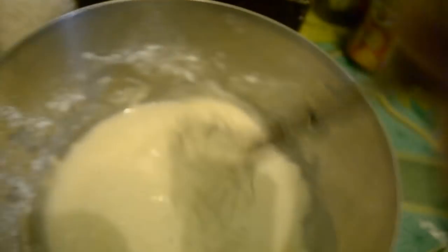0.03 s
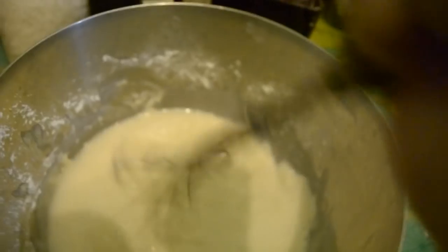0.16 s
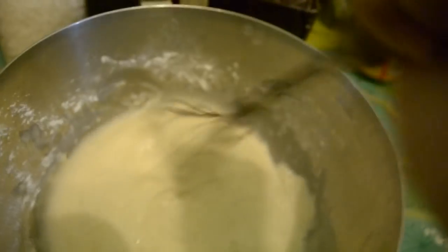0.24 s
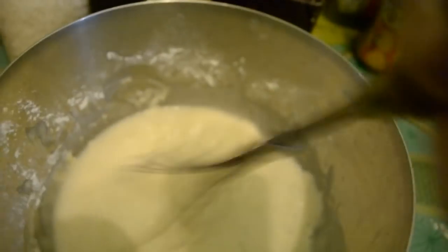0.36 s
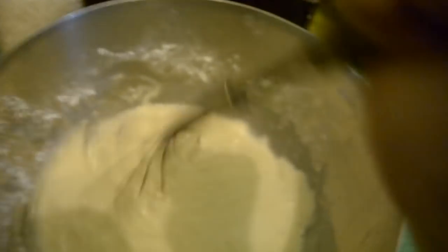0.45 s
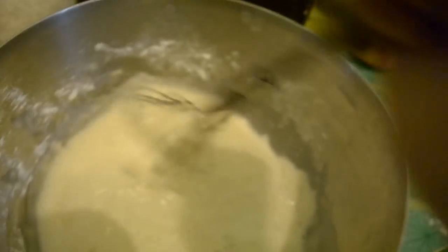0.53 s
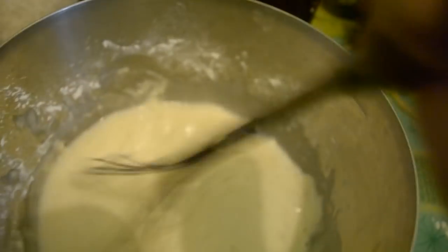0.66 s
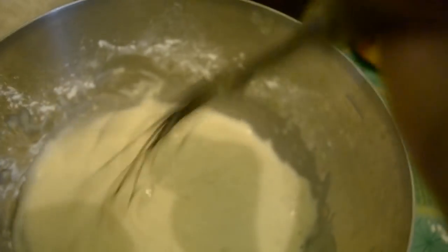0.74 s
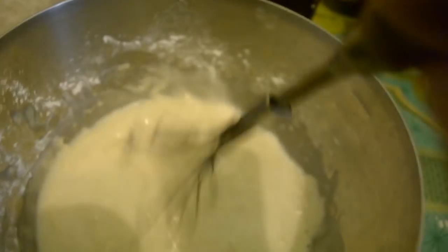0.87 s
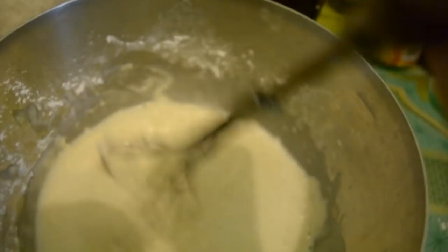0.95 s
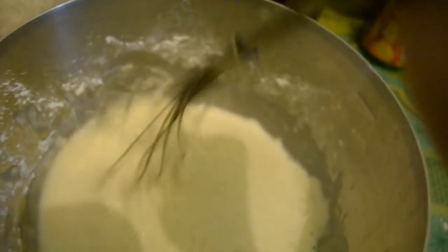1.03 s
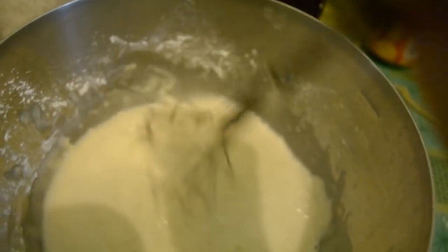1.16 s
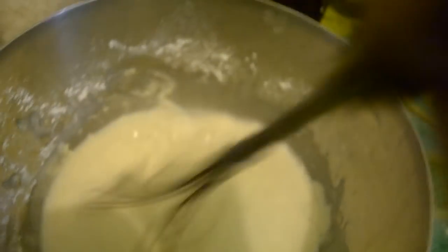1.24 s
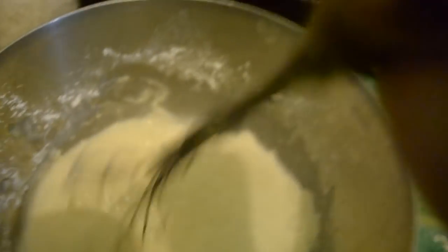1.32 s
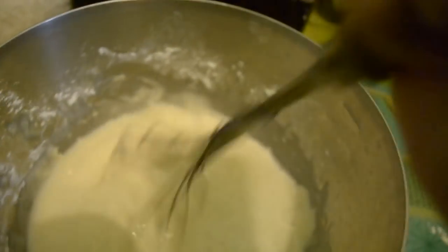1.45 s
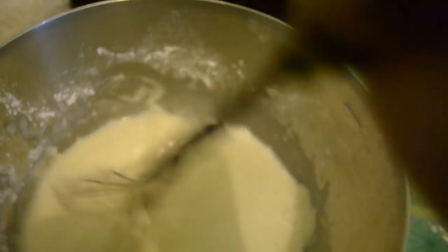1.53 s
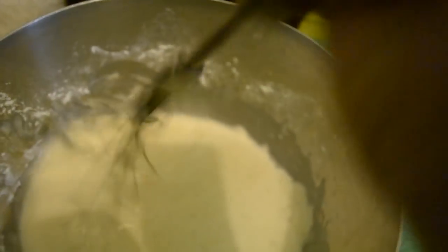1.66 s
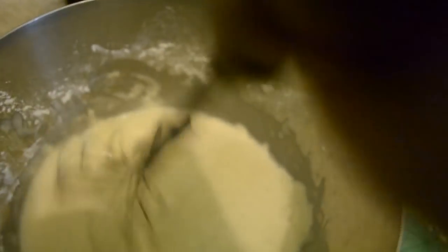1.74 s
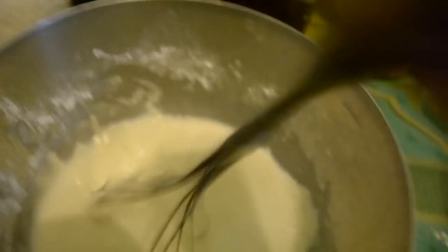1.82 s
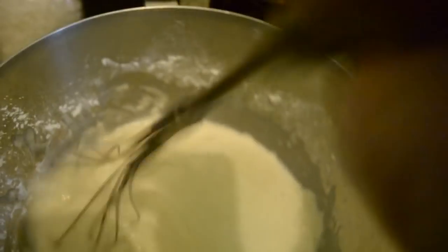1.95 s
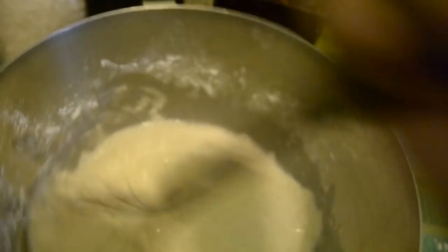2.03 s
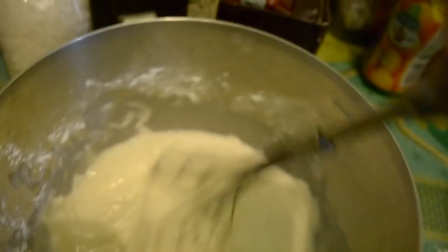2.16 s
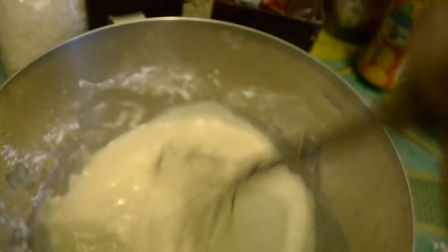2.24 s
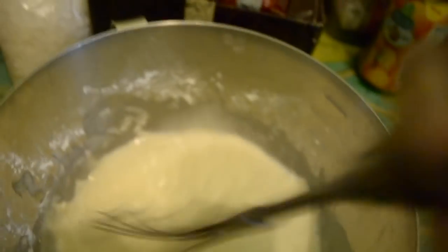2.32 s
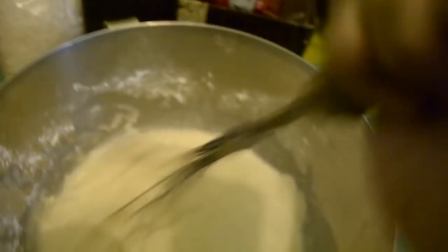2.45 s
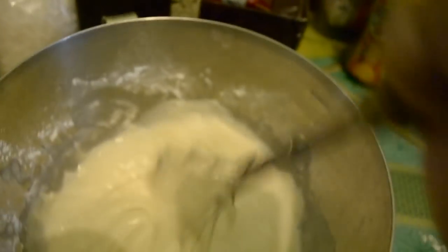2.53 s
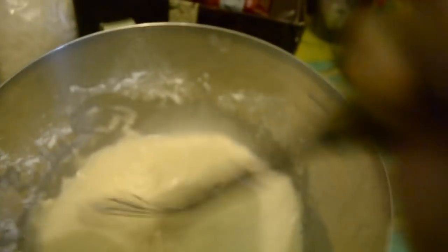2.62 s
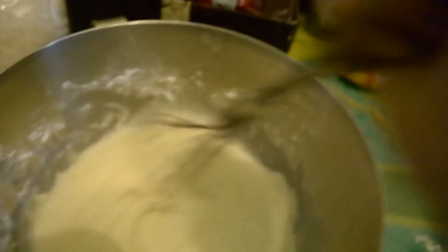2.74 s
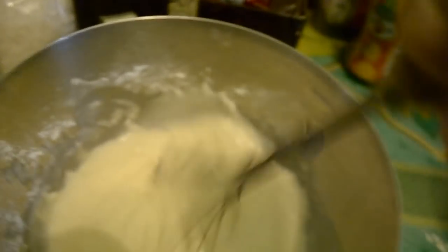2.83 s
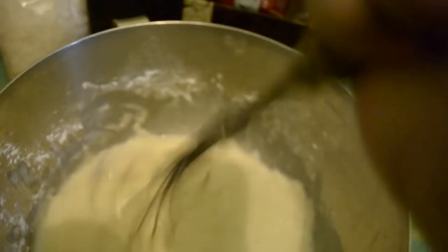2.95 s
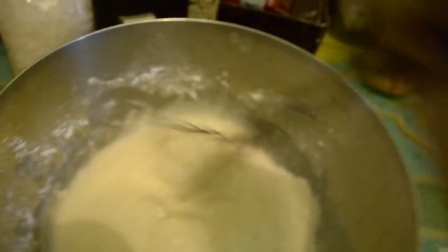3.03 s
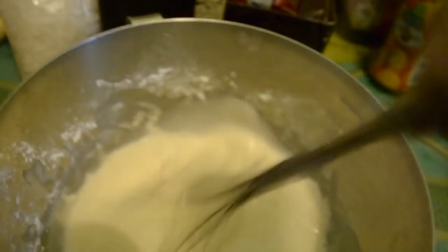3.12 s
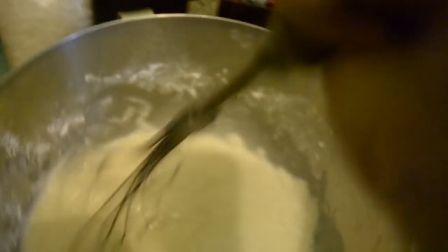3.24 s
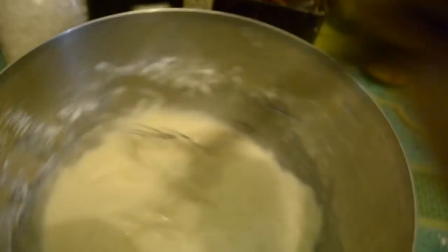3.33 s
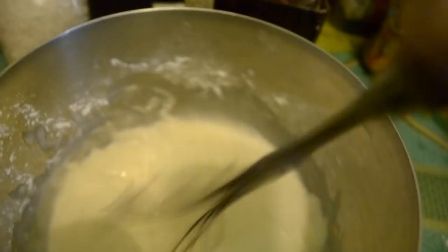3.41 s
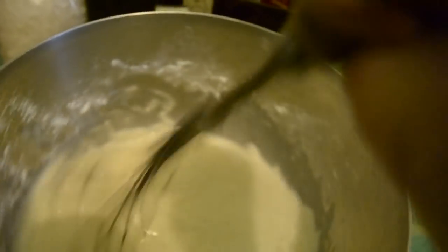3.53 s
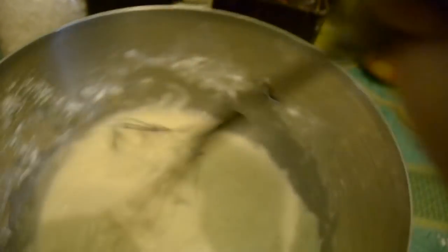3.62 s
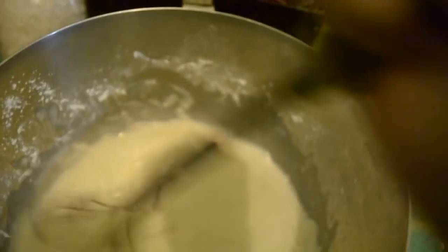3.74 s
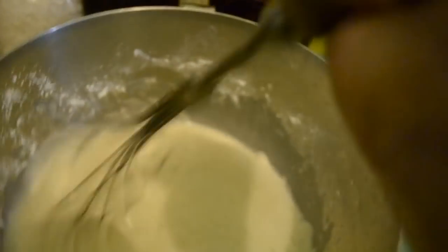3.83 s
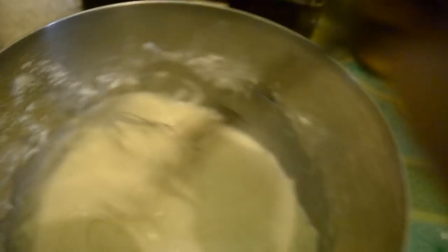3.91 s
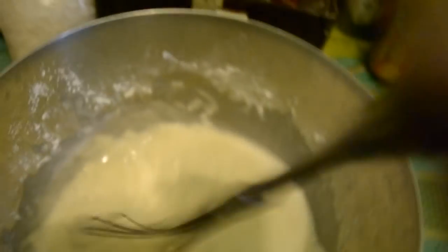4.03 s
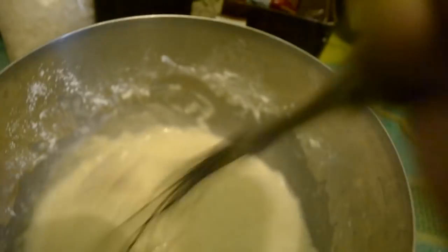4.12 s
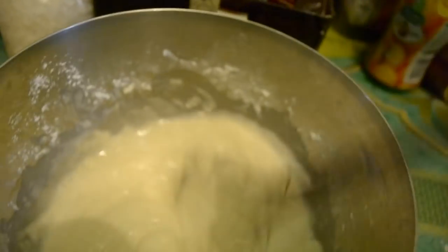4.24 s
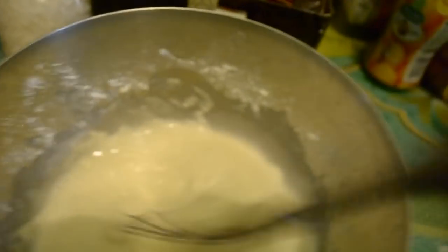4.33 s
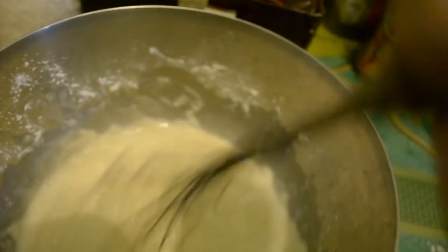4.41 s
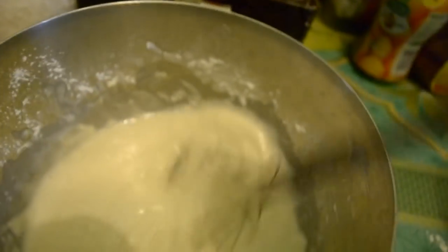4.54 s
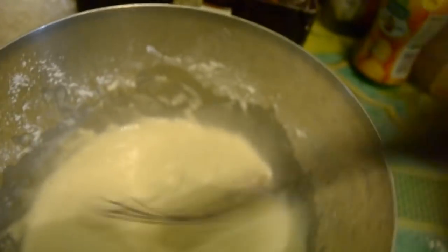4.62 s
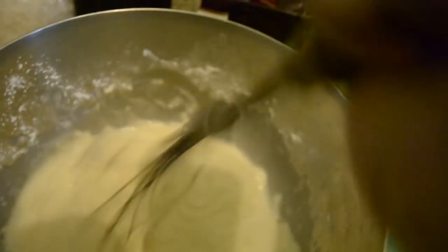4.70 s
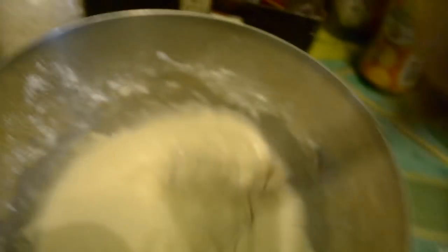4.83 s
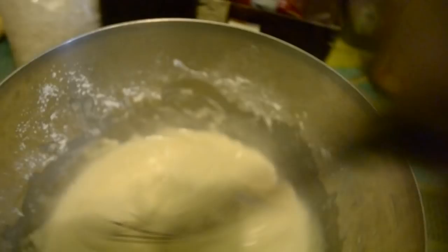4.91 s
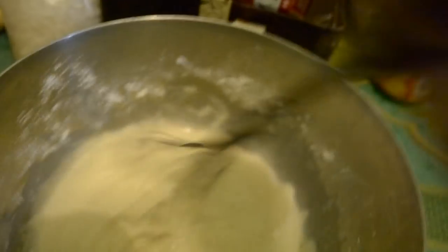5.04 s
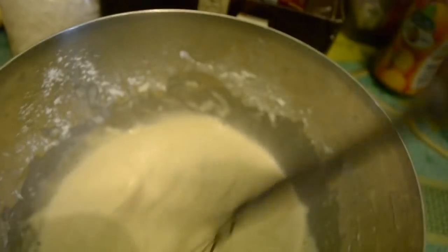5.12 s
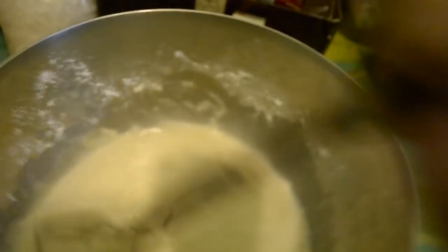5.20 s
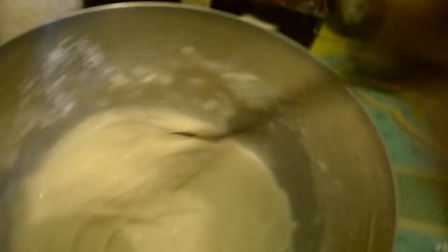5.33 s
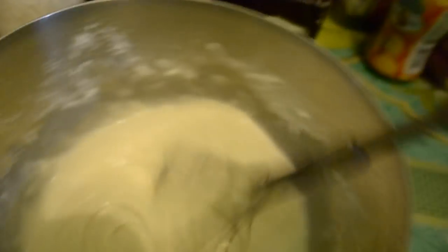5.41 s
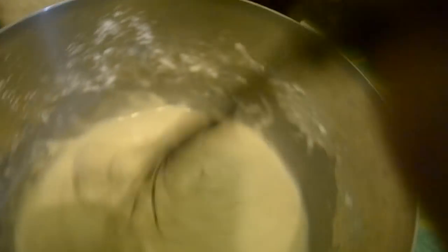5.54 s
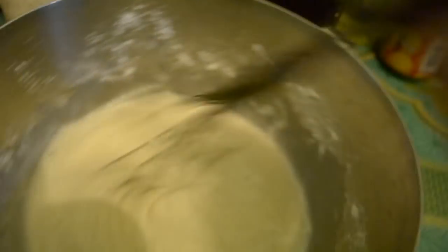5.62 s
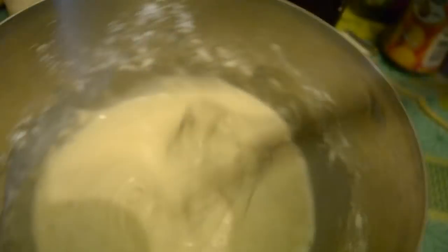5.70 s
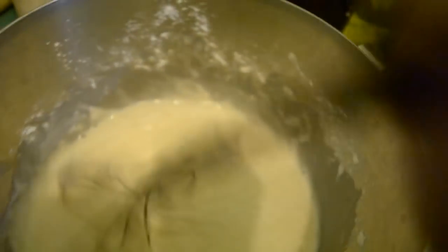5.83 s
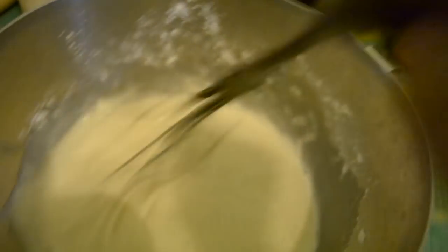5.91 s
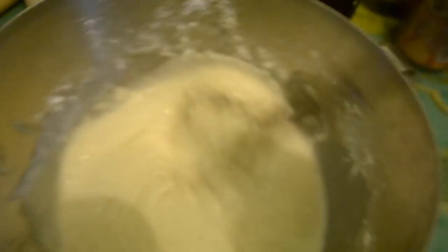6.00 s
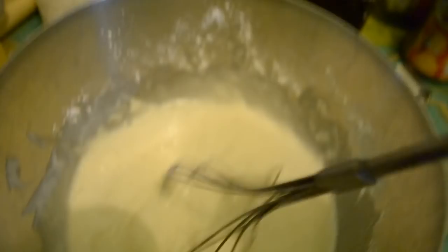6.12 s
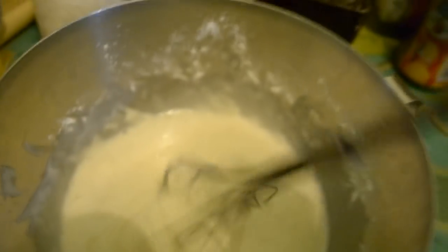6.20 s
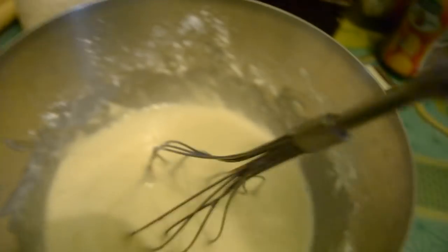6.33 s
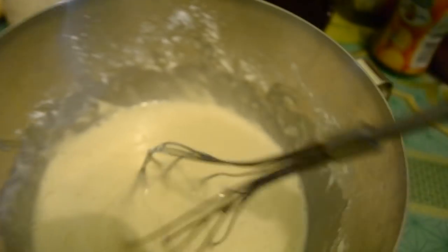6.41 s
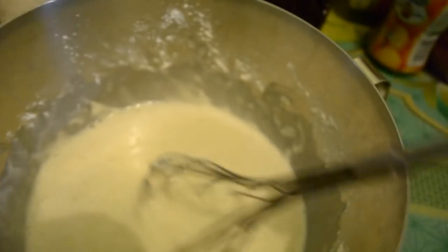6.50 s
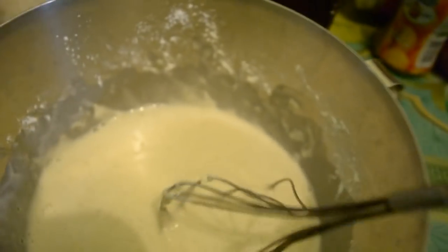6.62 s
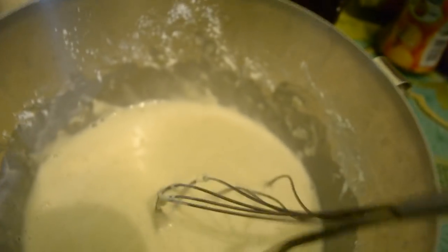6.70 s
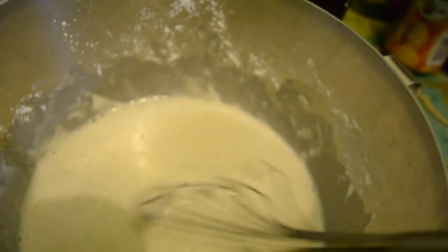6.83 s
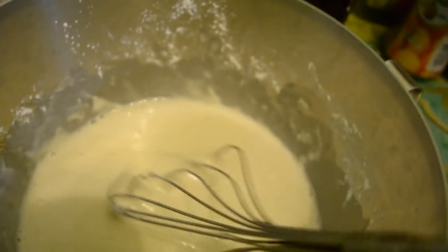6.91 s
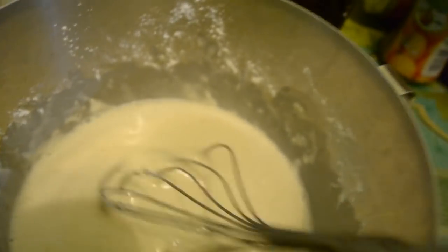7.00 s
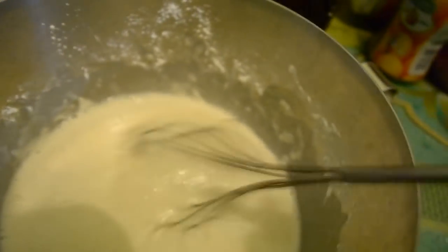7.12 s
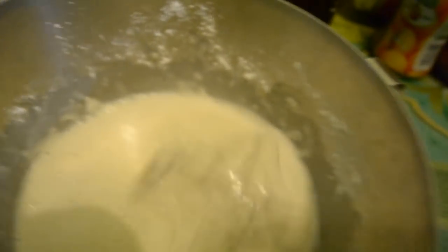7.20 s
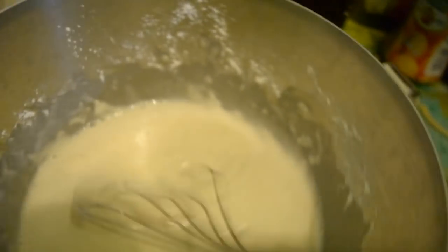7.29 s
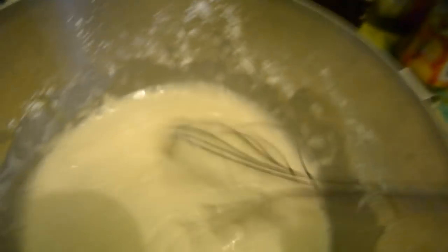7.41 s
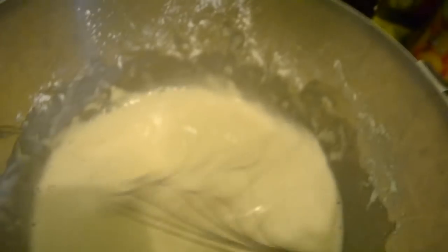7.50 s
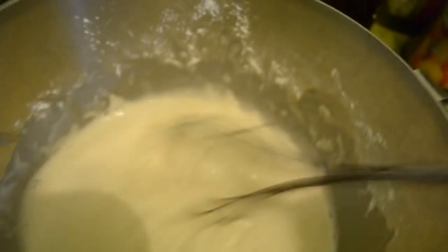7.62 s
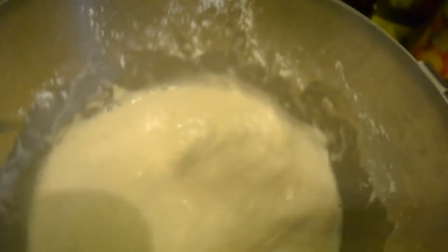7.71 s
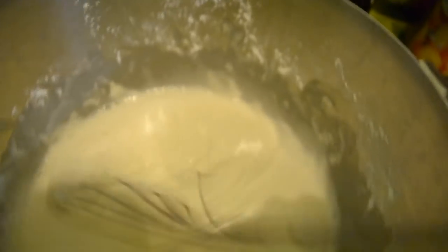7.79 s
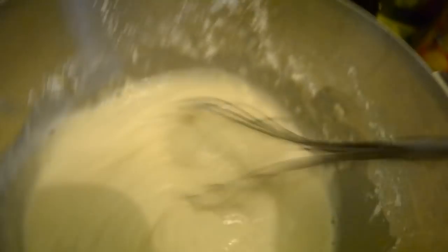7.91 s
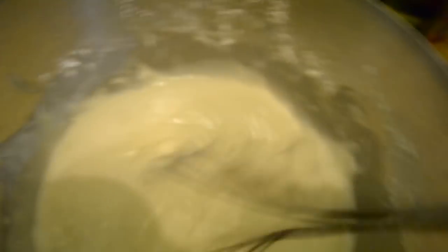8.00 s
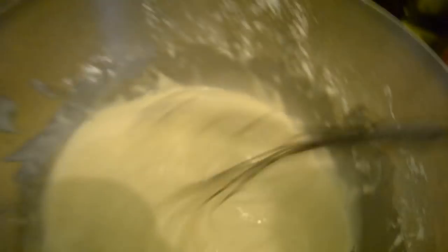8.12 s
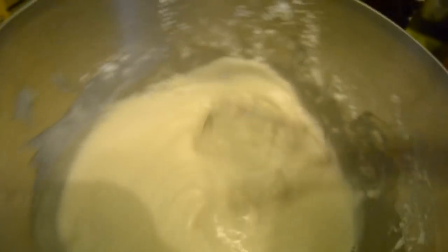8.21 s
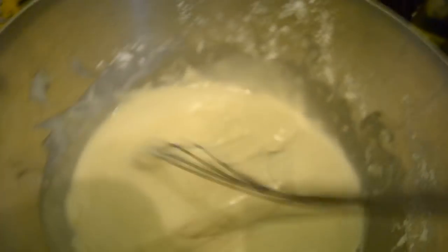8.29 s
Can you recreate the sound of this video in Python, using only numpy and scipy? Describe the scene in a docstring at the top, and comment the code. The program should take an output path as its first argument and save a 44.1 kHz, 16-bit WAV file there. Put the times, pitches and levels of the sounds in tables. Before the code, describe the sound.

In a small kitchen, close to a thin-sounding microphone with little bass, a wire whisk beats runny batter in a steel bowl. From 0 s, short gritty scrapes come roughly six a second, uneven in force, each mixing midrange grating on damped steel, rattling wires and a bright wet swish. Small knocks and dull bowl thuds punctuate them; a soft batter slap falls near 1.8 s. From 2.3 s strokes become steadier, with tiny squeaks around 3 kHz. The hardest, busiest scraping runs about 3.9-5.3 s, with squeaks clustered at 4.7-5.1 s. It softens until 6.3 s, then nearly rests. Light touches return at 6.9 s, and firm ringing strokes from 7.25 s continue to the end at about 8.3 s, with a strong knock at 7.8 s. Behind lie soft room noise, faint steady tones, a low hum fading by 2.3 s and very faint, high, cricket-like chirping.

```python
"""Whisking batter in a steel bowl

A wire whisk beats thin batter, about six strokes a second, with a short rest.
Filtered grit makes the wires grate over batter-damped steel and swish through the liquid.
Noise bursts through the same resonances knock on the bowl; unsteady tones squeak.
Behind: kitchen noise, steady tones, a fading low hum and faint, high, cricket-like chirping."""
import sys
import numpy as np
from scipy import signal
from scipy.io import wavfile
from scipy.ndimage import uniform_filter1d

SR = 44100
rng = np.random.default_rng(int(sys.argv[2]) if len(sys.argv) > 2 else 0)


def file_out(sig):
    """Save sig as 16-bit WAV at sys.argv[1]."""
    # one column per channel
    cols = np.atleast_2d(sig).T
    # limit, then scale
    lim = np.clip(cols, -1, 1)
    pcm = np.round(lim * 32767).astype(np.int16)
    wavfile.write(sys.argv[1], SR, pcm)


N = 368235
TIME_S = np.arange(N) / SR


def amp(db):
    """Decibels to gain."""
    return 10 ** (np.asarray(db) / 20)


def evened(x):
    """Scales to an rms of one."""
    return x / np.sqrt(np.mean(x ** 2) + 1e-20)


def steadied(x, size=900):
    """Keeps the fine grain of a force while its short-term rms (size samples) is held at one."""
    return x / np.sqrt(abs(uniform_filter1d(x ** 2, size=size)) + 1e-6)


def add(mix, start_s, sound):
    """Mixes a sound in at start_s."""
    part = mix[max(round(start_s * SR), 0):][:len(sound)]
    part += sound[:len(part)]


def wander(rate_hz, size=N):
    """Slow chance, rms one: random values, two per cycle of rate_hz, joined by straight lines."""
    place = np.arange(size) * 2 * rate_hz / SR
    knots = rng.standard_normal(size // 10)
    return evened(np.interp(place, np.arange(len(knots)), knots))


def fuzzy(pitch_hz, width_hz, size=N):
    """A tone whose level and phase wander: two randomly weighted quadratures, rms about one."""
    angle = 2 * np.pi * pitch_hz * np.arange(size) / SR
    in_phase = wander(width_hz, size=size) * np.cos(angle)
    quadrature = wander(width_hz, size=size) * np.sin(angle)
    return in_phase + quadrature


def response(body, modes=(), size=4096):
    """Causal impulse response of unit energy: a broad colour with resonances standing on it."""
    hz = np.fft.rfftfreq(size, 1 / SR)
    knots_hz, knots_db = np.transpose(body)
    power = amp(np.interp(np.log(hz + 1), np.log(knots_hz), knots_db)) ** 2
    for centre_hz, width_hz, mode_db in modes:
        power = power + (amp(mode_db) / (1 + ((hz - centre_hz) / width_hz) ** 2 * 2)) ** 2
    # minimum phase: the Hilbert transform of the log gain gives the phase
    log_gain = np.log(np.r_[power, power[-2:0:-1]]) / 2
    spectrum = np.exp(np.conj(signal.hilbert(log_gain)))
    ring = np.fft.ifft(spectrum).real[:size // 2]
    ring = ring * signal.windows.hann(size)[size // 2:]
    return ring / np.linalg.norm(ring)


def through(x, ring):
    """Sends a force through a response."""
    return signal.oaconvolve(x, ring)[:len(x)]


def grit(rate_hz, spread_db, smooth):
    """Tiny slips or bursting bubbles of unequal size over a smooth rub."""
    sizes = amp(spread_db * np.minimum(rng.exponential(1, N), 4))
    slips = sizes * rng.choice([-1, 1], N) * (rng.random(N) < rate_hz / SR)
    return evened(evened(slips) + smooth * rng.standard_normal(N))


# kitchen noise colour: hz [Hz], density_db [dB per Hz, relative]
KITCHEN_COLOUR = [(25, -22), (70, -38), (90, -23), (130, -13), (170, -3.5), (280, 2.5), (450, -3.5),
                  (900, -4), (1500, -7), (2400, -11), (3500, -20), (6000, -26), (8200, -31), (10300, -33),
                  (11200, -54)]
# faint steady tones: pitch_hz [Hz], level_db [dB]
KITCHEN_TONES = [(160, -78), (488, -73.5), (775, -71.5), (920, -71.5)]
# drone gain over time: time_s [s], gain_db [dB]
DRONE_GAIN = [(0, -71), (1.5, -73.5), (2.3, -83.5), (8.3, -89.5)]
KITCHEN_DB, DRONE_HZ = -58.5, 104.8
CHIRP_HZ, CHIRP_RATE_HZ, CHIRP_DB = 6790, 8.2, -75


def background():
    """Room noise, faint tones, a distant drone that fades away and an even train of high chirps."""
    air = amp(KITCHEN_DB) * through(rng.standard_normal(N), response(KITCHEN_COLOUR))
    tones = sum(amp(level_db) * fuzzy(pitch_hz, 5) for pitch_hz, level_db in KITCHEN_TONES)
    drone = amp(1) * fuzzy(DRONE_HZ, 11) + amp(4) * fuzzy(3 * DRONE_HZ, 10) + amp(10) * fuzzy(370, 140)
    drone = amp(np.interp(TIME_S, *np.transpose(DRONE_GAIN))) * drone
    gate = np.maximum(np.cos(2 * np.pi * CHIRP_RATE_HZ * (TIME_S - 6.68)), 0)
    chirps = amp(CHIRP_DB) * evened(gate * fuzzy(CHIRP_HZ, 230))
    return air + tones + drone + chirps


def room(x, t60_s=0.097, wet_db=-12, late_t60_s=0.26, late_db=-16, dull_hz=7000, drift_hz=1.697,
         size=22000, count=3):
    """Near reflections and a fainter, longer wash; they change as the arm and bowl move."""
    t, wet = np.arange(size) / SR, np.zeros(N)
    fade = (t > .005) * (amp(-60 * t / t60_s) + amp(late_db - 60 * t / late_t60_s))
    for k in range(count):
        taps = rng.standard_normal(size) * (rng.random(size) < 4000 / SR) * fade
        tail = signal.lfilter(*signal.butter(1, min(dull_hz, SR / 3), fs=SR), taps)
        # drift_hz counts half turns of the crossfade per second
        share = np.sqrt(2 / count) * np.cos(np.pi * (drift_hz * TIME_S + k / count))
        wet += through(share * x, tail / np.linalg.norm(tail))
    return x + amp(wet_db) * wet


# batter slapping down: start_s [s], level_db [dB], fade_s [s, Gaussian sigma]
SLOP_EVENTS = [(.312, -53.5, 0.032), (1.828, -44.5, 0.037), (6.459, -61.5, 0.045)]
# slap colour: hz [Hz], level_db [dB, relative]
SLOP_COLOUR = [(30, -29), (100, -24), (220, 9.5), (450, 10), (900, -2), (2000, -1.5), (5000, -2),
               (11000, -11.5)]


def slops(size=10000):
    """Batter falls back with a dull, crackling slap: fading grit through a broad colour."""
    swell, t = np.zeros(N), np.arange(size) / SR
    for start_s, level_db, fade_s in SLOP_EVENTS:
        add(swell, start_s, amp(level_db) * np.exp(-(t / fade_s) ** 2 / 2))
    crackle = steadied(grit(rate_hz=1200, spread_db=4, smooth=.5))
    return through(swell * crackle, response(SLOP_COLOUR))


def bowed(x, start_s, length_s, level_db):
    """Cuts a short swell out of a sustained sound."""
    part = evened(x)[:round(length_s * SR)]
    return start_s, amp(level_db) * part * signal.windows.tukey(len(part), .5)


# wire sticking and slipping on steel: start_s [s], length_s [s], pitch_hz [Hz], level_db [dB]
SQUEAK_EVENTS = [(0.24, 0.025, 3150, -42.5), (0.478, 0.04, 3075, -46), (1.375, 0.014, 2970, -40.5),
                 (2.417, 0.077, 2930, -44.5), (3.018, 0.032, 3047, -37.5), (3.42, 0.032, 4020, -41.5),
                 (3.556, 0.032, 3020, -41), (4.452, 0.049, 3010, -37), (4.729, 0.031, 3015, -35.5),
                 (4.761, 0.024, 2315, -42), (4.778, 0.043, 3180, -45), (5.028, 0.01, 3040, -32),
                 (5.042, 0.019, 3110, -32), (5.071, 0.013, 3040, -32), (5.588, 0.061, 3010, -37),
                 (5.606, 0.015, 5620, -43), (5.896, 0.03, 2940, -41), (7.87, 0.044, 3084, -43.5)]
# wet film squeezed under a wire: start_s [s], length_s [s], pitch_hz [Hz], level_db [dB]
SIZZLE_EVENTS = [(1.315, 0.048, 8800, -52), (2.116, 0.027, 8500, -45), (3.239, 0.037, 9200, -46.5),
                 (4.571, 0.047, 10000, -55), (4.949, 0.074, 9270, -45.5), (5.381, 0.021, 9100, -44.5),
                 (5.992, 0.08, 9800, -48.5), (6.284, 0.051, 9740, -55)]


def squeaks(jitter=0.021, flutter_db=3, sizzle_width_hz=700, size=6000):
    """Stick-slip locks on to a wire resonance as an unsteady tone; the wet film sizzles far above."""
    out = np.zeros(N)
    for start_s, length_s, pitch_hz, level_db in SQUEAK_EVENTS:
        turns = np.cumsum(pitch_hz * (1 + jitter * wander(126, size=size))) / SR
        tone = np.sin(2 * np.pi * turns) * amp(flutter_db * wander(187, size=size))
        add(out, *bowed(tone, start_s, length_s, level_db))
    for start_s, length_s, pitch_hz, level_db in SIZZLE_EVENTS:
        add(out, *bowed(fuzzy(pitch_hz, sizzle_width_hz, size=size), start_s, length_s, level_db))
    return out


# damped wall resonances: centre_hz [Hz], width_hz [Hz], level_db [dB, relative]
WALL_MODES = [(944, 44, -30), (1140, 40, 1), (1240, 130, -7.5), (1326, 108, 10), (1430, 27, -10),
              (1890, 230, -8.5)]
# broad colour under them: hz [Hz], level_db [dB, relative]
WALL_COLOUR = [(30, -75), (200, -48), (500, -8.5), (900, -21.5), (1250, 12), (1700, -20), (2600, -20),
               (4500, -37), (11000, -80)]


def wall_response():
    """Steel wall damped by batter."""
    return response(WALL_COLOUR, WALL_MODES)


# resonances of the wires on the wall: centre_hz [Hz], width_hz [Hz], level_db [dB, relative]
WIRE_RESONANCES = [(1934, 205, -4.5), (2290, 147, -0.5), (3014, 150, -3), (3170, 170, -0.5), (3495, 280, 0),
                   (3880, 110, -6), (4340, 310, -7.5)]
# broad colour under them: hz [Hz], level_db [dB, relative]
WIRE_COLOUR = [(100, -65), (1000, -26), (1800, -12), (2650, -6), (3400, -6), (4200, -18), (5500, -8),
               (11000, -50.5)]


def wire_response():
    """Whisk wires shaken against the steel."""
    return response(WIRE_COLOUR, WIRE_RESONANCES)


# high resonances of the splash: centre_hz [Hz], width_hz [Hz], level_db [dB, relative]
SPLASH_RESONANCES = [(4800, 110, 3), (5670, 63, 3), (5947, 290, 5), (6960, 140, -1.5), (8460, 230, -2.5)]
# broad colour under them: hz [Hz], level_db [dB, relative]
SPLASH_COLOUR = [(60, -62), (1000, -20), (3000, -3.5), (4500, -4), (6200, -2), (6900, -1.5), (8500, -1),
                 (9700, -3.5), (10500, -7), (11200, -31)]


def splash_response():
    """Bright colour of torn batter and wet ticks."""
    return response(SPLASH_COLOUR, SPLASH_RESONANCES)


# batter-loaded bottom resonances: centre_hz [Hz], width_hz [Hz], level_db [dB, relative]
BOTTOM_RESONANCES = [(676, 78, -7), (855, 120, -0.5), (933, 152, 4), (1099, 104, 5.5)]
# broad colour under them: hz [Hz], level_db [dB, relative]
BOTTOM_COLOUR = [(30, -66), (130, -57.5), (300, -46), (480, -36), (620, -5), (1000, -21), (1600, -4),
                 (2600, -27), (11000, -88)]


def bottom_response():
    """Bowl bottom, tuned low by its load of batter."""
    return response(BOTTOM_COLOUR, BOTTOM_RESONANCES)


# rim gain, set by the whisk's lean: time_s [s], gain_db [dB re force]
RIM_GAIN = [(0, -11.5), (1.5, -6), (2.4, -29), (3.7, -0.5), (4.6, -27), (5.9, -19), (6.9, 8), (7.4, -6.5),
            (8.3, -3.5)]
RIM_HZ, RIM_WIDTH_HZ = 2320, 93


def rim(force, size=2048):
    """The bare rim rings above the damped wall as one decaying sine."""
    t = np.arange(size) / SR
    ring = np.sin(2 * np.pi * RIM_HZ * t) * np.exp(-np.pi * RIM_WIDTH_HZ * t)
    gain = amp(np.interp(TIME_S, *np.transpose(RIM_GAIN)))
    return gain * through(force, ring / np.linalg.norm(ring))


# wire strikes: start_s [s], strength_db [dB re level_db of knocks()],
# wall_db, tick_db (wet tick), bottom_db [dB, shares before the sum is evened]
KNOCK_EVENTS = [(0.103, -29.5, -8, -18, -7), (0.121, -24, -13, -16, -22), (0.251, -28, -19, -36, -14.5),
                (0.66, -27.5, -18, -42, -9), (0.691, -29, 5, -2.5, -18), (0.923, -24, -7.5, -12, -9),
                (1.128, -34, -29, -17, -22), (1.211, -35.5, -24, -20, -16), (1.222, -27.5, -18, -10.5, -8),
                (1.255, -29, -4, -1, -3), (1.265, -26.5, -12, -22, 6), (1.36, -33, -20, 3, -22),
                (1.512, -29, -18, -43, -20), (1.777, -33, -28, -30, -9), (1.843, -30.5, -26, -11, -24),
                (2.191, -17, -12, -16, -1), (2.405, -33, -18, -25, -8), (2.622, -30.5, -6, -31, -9),
                (2.846, -35, -20, 13, -22), (2.922, -24, -3, -38, -38), (3.207, -32, -21, 4, -13),
                (3.414, -29, -24, -27, -15), (3.667, -30, 10, -15, -19), (4.063, -22, -20, -17, -7),
                (4.081, -27, -23, -20.5, -10.5), (4.321, -27.5, 13, -24, -5), (4.456, -30, -8, -29, -31),
                (4.649, -21.5, -19, -18, -11), (4.713, -23, -7, -22, -23), (4.852, -19, -2.5, -14, -2.5),
                (4.939, -25.5, 14, -19, -12.5), (5.029, -39, -6, -19, -27), (5.065, -29, -23, 1, -24),
                (5.218, -22, 11, -27, 6), (5.474, -31, -23, -25, -23), (5.513, -21.5, -15, -27, -4.5),
                (5.854, -27, 10, -29, -23), (6.594, -46, 9, -21, -15), (6.903, -34, -10, -32, -18),
                (6.941, -27, -7, -16, -14), (7.254, -39, 9, -8.5, -20), (7.827, -18.5, 3, -32, -13),
                (7.98, -29, -16, -1, -25), (8.052, -23, 7, -10, -9), (8.193, -42.5, -10, -15, -30),
                (8.297, -34.5, -20, -20, -20)]


def knocks(wall, wires, splash, bottom, chatter_s=0.0025, first=1.0, level_db=-20, wire_db=-8, size=3000):
    """A loop of wire hits the bowl once, then chatters for a few milliseconds."""
    out, t = np.zeros(N), np.arange(size) / SR
    for start_s, strength_db, wall_db, tick_db, bottom_db in KNOCK_EVENTS:
        blow = rng.standard_normal(size) * np.sqrt(t / chatter_s) * np.exp(-t / chatter_s)
        blow[0] = first
        shares = ((wall, wall_db), (wires, wire_db), (splash, tick_db), (bottom, bottom_db))
        sound = sum(amp(share_db) * evened(through(blow, ring)) for ring, share_db in shares)
        add(out, start_s, amp(strength_db + level_db) * evened(sound))
    return out


def shifting(x, patchy_db, size=512):
    """The point of contact travels, so different resonances stand out from moment to moment."""
    z = signal.stft(x, nperseg=size, noverlap=size * 3 // 4)[2]
    patches = rng.standard_normal(z.shape)
    for _ in range(2):
        patches = uniform_filter1d(patches, size=4, axis=0)  # across frequency
        patches = uniform_filter1d(patches, size=6, axis=1)  # across time
    z = z * evened(amp(patchy_db * 2 * np.tanh(evened(patches) / 2)))
    return signal.istft(z, nperseg=size, noverlap=size * 3 // 4)[1][:N]


def catches(rate_hz, fade_s, depth):
    """Wire after wire catches the steel: the force jumps and dies away."""
    kicks = (rng.random(N) < rate_hz / SR) * rng.uniform(0.42, 1, N)
    jumps = signal.lfilter([1], [1, -np.exp(-1 / (fade_s * SR))], kicks)
    return evened(1 + depth * jumps)


def pings(rate_hz=100, low_hz=3400, high_hz=10000, ring_s=0.0024, spread_db=4.0, size=1400):
    """Loops of wire slip past each other and ring briefly, each at its own pitch."""
    out, t = np.zeros(N), np.arange(size) / SR
    for when, height, strength in rng.random((int(rate_hz * N / SR), 3)):
        pitch_hz = low_hz * (high_hz / low_hz) ** height
        tone = np.sin(2 * np.pi * pitch_hz * t) * t * np.exp(-t / ring_s)
        add(out, when * N / SR, tone * amp(-spread_db * np.log(strength + 0.032)))
    return evened(out)


# whisk strokes: start_s [s], length_s [s], press and sweep [crest place, share of length],
# rub_db (wall), scrape_db (wires), swish_db (batter), dig_db (bottom) [dB at the crest]
WHISK_STROKES = [(0.049, 0.14, 0.43, 0.42, -48.5, -46.5, -47, -52.0),
                 (0.143, 0.096, 0.34, 0.39, -40.5, -42.5, -33, -47.5),
                 (0.31, 0.062, 0.22, 0.34, -67, -51, -52.5, -53),
                 (0.378, 0.13, 0.65, 0.6, -40.5, -41, -43.5, -50),
                 (0.575, 0.059, 0.93, 0.67, -57, -48, -43.5, -55.0),
                 (0.643, 0.12, 0.55, 0.51, -40.5, -45.0, -53, -48.5),
                 (0.867, 0.1, 0.58, 0.66, -45.5, -46.5, -44, -43.0),
                 (1.144, 0.058, 1.0, 0.023, -67, -66, -50, -65),
                 (1.202, 0.084, 0.79, 0.59, -38, -42.5, -50, -39.5),
                 (1.276, 0.099, 0.25, 0.42, -45.5, -41.5, -41.5, -51.0),
                 (1.42, 0.076, 0.5, 0.36, -45.5, -42, -52, -57),
                 (1.505, 0.062, 0.57, 0.91, -45.5, -40.5, -45, -50.5),
                 (1.707, 0.085, 1.0, 0.48, -75, -53.5, -56, -74),
                 (1.807, 0.071, 0.7, 0.88, -55, -51.5, -47.5, -47.0),
                 (2.02, 0.061, 0.56, 0.45, -48.5, -44.5, -36, -44.5),
                 (2.09, 0.14, 0.92, 0.33, -53, -45, -47.5, -43.5),
                 (2.206, 0.08, 0.88, 0.73, -52.5, -47.5, -56, -57),
                 (2.323, 0.16, 0.39, 0.74, -39, -42.5, -52, -50),
                 (2.495, 0.13, 0.4, 0.45, -39.5, -44, -49.5, -52),
                 (2.572, 0.2, 0.55, 0.41, -42.5, -40.5, -49.5, -49.0),
                 (2.775, 0.34, 0.34, 0.19, -49, -43, -45, -47),
                 (2.962, 0.17, 0.32, 0.41, -40, -42, -64, -54.5),
                 (3.141, 0.15, 0.53, 0.67, -46, -43.5, -51.5, -51.5),
                 (3.315, 0.1, 0.47, 0.63, -47, -53, -59.5, -54.5),
                 (3.415, 0.23, 0.24, 0, -45, -39.5, -49.5, -49.5),
                 (3.613, 0.074, 0.56, 0.63, -45, -51, -57.5, -52),
                 (3.708, 0.1, 0.0031, 0.32, -43, -49.5, -55, -55),
                 (3.933, 0.12, 0.92, 0.84, -43.5, -36, -43.5, -46),
                 (4.059, 0.069, 0.03, 0.11, -31.5, -40, -50.0, -36),
                 (4.264, 0.16, 0.64, 0.44, -43.0, -42, -50.5, -50),
                 (4.425, 0.13, 0.48, 0.34, -39.5, -37, -46.5, -44.0),
                 (4.559, 0.16, 0.09, 0.048, -39, -40, -44, -44.0),
                 (4.669, 0.17, 0.26, 0.45, -39, -40, -46.0, -47.5),
                 (4.815, 0.2, 0.52, 0.82, -37, -37, -44, -40.5),
                 (5.011, 0.12, 0.66, 0.54, -39.5, -34, -54, -50.0),
                 (5.152, 0.14, 0.53, 0.46, -38.5, -44.5, -55.5, -47),
                 (5.303, 0.15, 0.64, 0.57, -47.5, -40, -49, -53.5),
                 (5.437, 0.17, 0.6, 0.17, -50.5, -42, -49.5, -52),
                 (5.565, 0.16, 0.56, 0.41, -58.5, -46, -55, -54.5),
                 (5.715, 0.2, 0.67, 0.33, -53, -52, -61, -55.5),
                 (5.895, 0.081, 0.047, 0.47, -54, -49.5, -66, -54.0),
                 (5.949, 0.22, 0.7, 0.32, -52.0, -49.5, -50.0, -50.5),
                 (6.103, 0.2, 0.38, 0.0, -50, -52.5, -77, -58),
                 (6.885, 0.16, 0.62, 0.32, -61, -58.5, -57.0, -53.5),
                 (7.079, 0.1, 0.54, 0.4, -59.5, -64, -61, -59),
                 (7.246, 0.2, 0.38, 0.46, -36.5, -40, -43.5, -43),
                 (7.457, 0.19, 0.71, 0.59, -37, -42, -44.5, -41),
                 (7.66, 0.13, 0.18, 0.48, -50, -50.5, -47.5, -56),
                 (7.77, 0.14, 0.4, 0.64, -38, -46, -43.5, -39.5),
                 (7.916, 0.18, 0.82, 0.26, -45, -59, -45.5, -53.5),
                 (8.038, 0.11, 0.7, 0.97, -38, -41.5, -49.5, -40),
                 (8.154, 0.097, 0.45, 0.63, -58, -65.5, -45.5, -54.5),
                 (8.282, 0.077, 0.65, 0.17, -38.5, -45.0, -51.5, -40.5)]
LAND_S, LIFT_S = 0.012, 0.078  # linear rise; time to fall by 60 dB
# fall away from the crest, dB per stroke length
RUB_FALL_DB, SCRAPE_FALL_DB, SWISH_FALL_DB, DIG_FALL_DB = 25.5, 19, 23.5, 21.5


def pressure():
    """Strokes land, press and sweep to a crest, ease and lift: gains of rub, scrape, swish, dig."""
    power = np.zeros((4, N))
    falls_db = (RUB_FALL_DB, SCRAPE_FALL_DB, SWISH_FALL_DB, DIG_FALL_DB)
    for start_s, length_s, press, sweep, *levels_db in WHISK_STROKES:
        t = np.arange(0, length_s + LIFT_S, 1 / SR)
        contact = np.minimum(t / LAND_S, 1) * amp(-60 * np.maximum(t - length_s, 0) / LIFT_S)
        crests = (press, sweep, sweep, press)
        for layer, level_db, fall_db, crest in zip(power, levels_db, falls_db, crests):
            gain = contact * amp(level_db - fall_db * abs(t / length_s - crest))
            add(layer, start_s, gain ** 2)  # overlapping strokes add in power
    return np.sqrt(power)


def whisking(wall, wires, splash, bottom):
    """Strokes dig into the bottom, grate up the wall, shake the wires and tear through the batter."""
    rub, scrape, swish, dig = pressure()
    force = catches(rate_hz=130, fade_s=0.0096, depth=3.0)
    slips = steadied(force * grit(rate_hz=2500, spread_db=2.5, smooth=0.5))
    bubbles = steadied(force ** 0.78 * grit(rate_hz=3500, spread_db=-1.0, smooth=1.0))
    drag = steadied(force * grit(rate_hz=1500, spread_db=-1.5, smooth=0.76))
    grating = through(rub * slips, wall) + rim(rub * slips)
    digging = through(dig * drag, bottom)
    scraping = through(scrape * slips, wires)
    swishing = through(swish * (bubbles + amp(-9.0) * pings()), splash)
    return shifting(grating + digging, patchy_db=4.5) + shifting(scraping + swishing, patchy_db=6.0)


def scene():
    """The whisk and bowl in the kitchen."""
    rings = (wall_response(), wire_response(), splash_response(), bottom_response())
    bowl = whisking(*rings) + knocks(*rings) + squeaks() + slops()
    return (room(bowl) + background())[None]


LOW_CUT_HZ, EDGE_HZ = 70, 11130


def record(dry):
    """A small microphone with little bass, then the recorder's steep band limit."""
    low_cut = signal.butter(4, LOW_CUT_HZ, "high", fs=SR, output="sos")
    thin = signal.sosfilt(low_cut, dry)
    band_limit = signal.firwin(301, EDGE_HZ, window=("kaiser", 8), fs=SR)
    return signal.oaconvolve(thin, band_limit[None], "same")


dry = scene()
out = record(dry)
file_out(out)
```